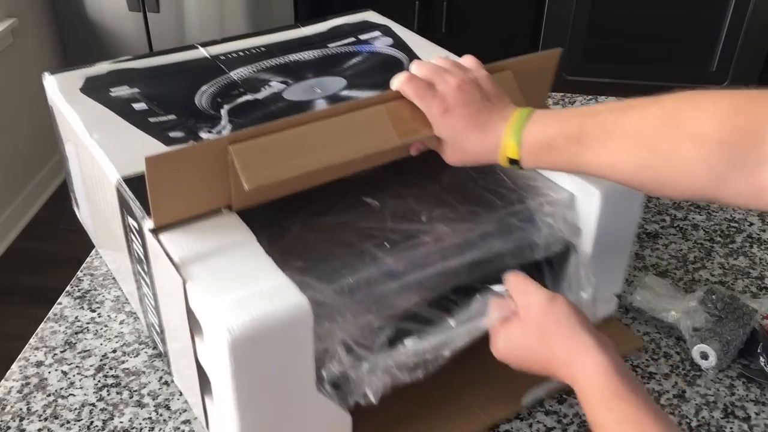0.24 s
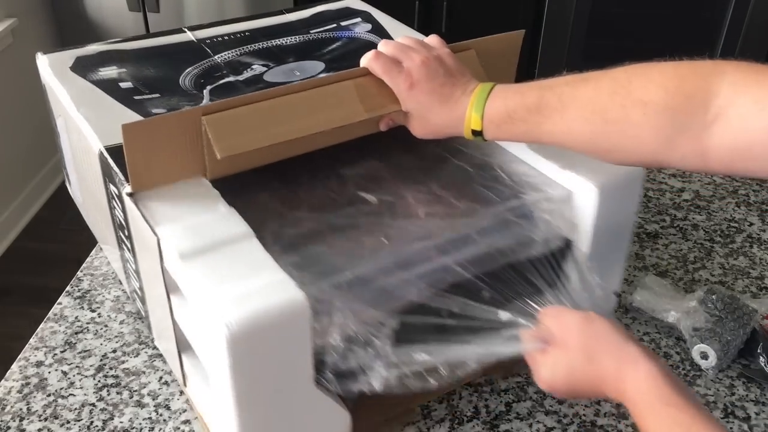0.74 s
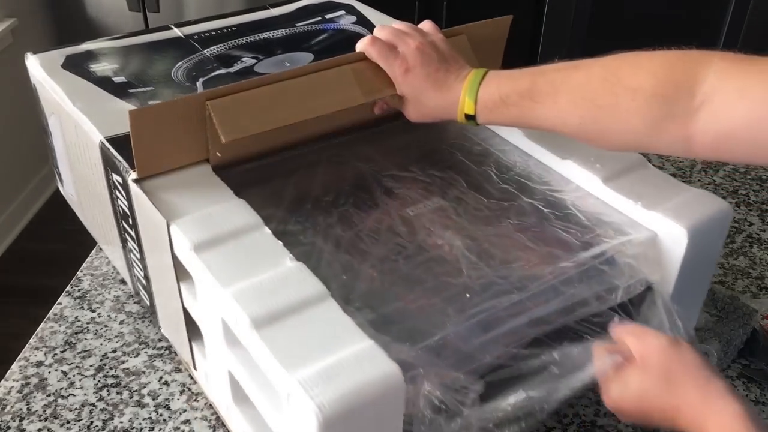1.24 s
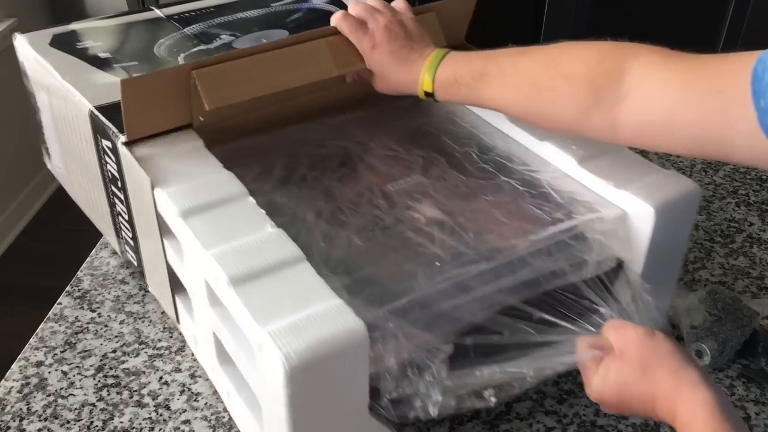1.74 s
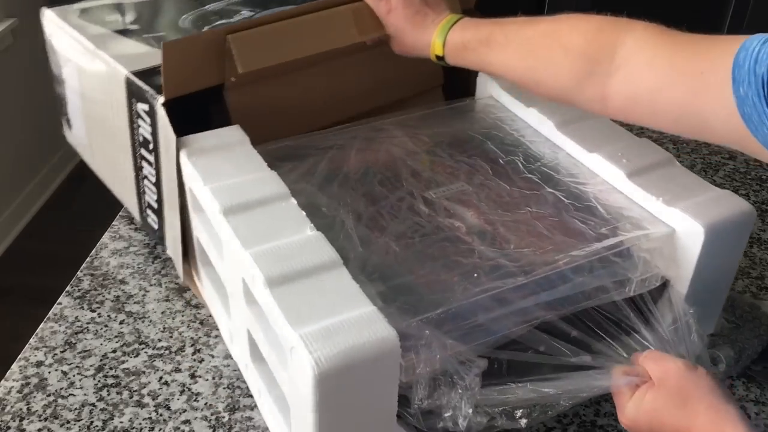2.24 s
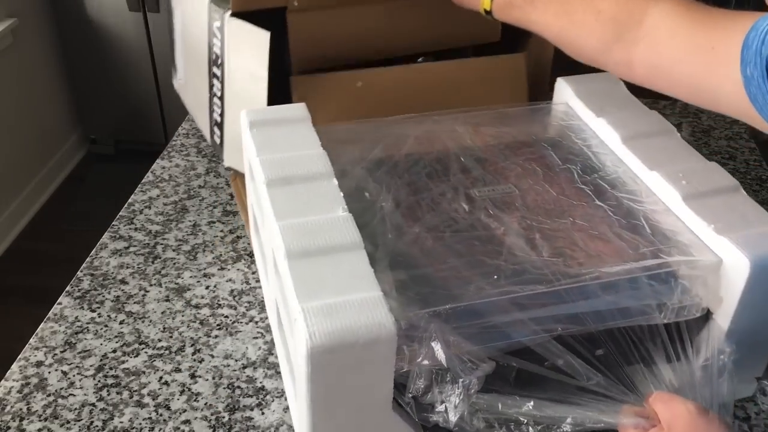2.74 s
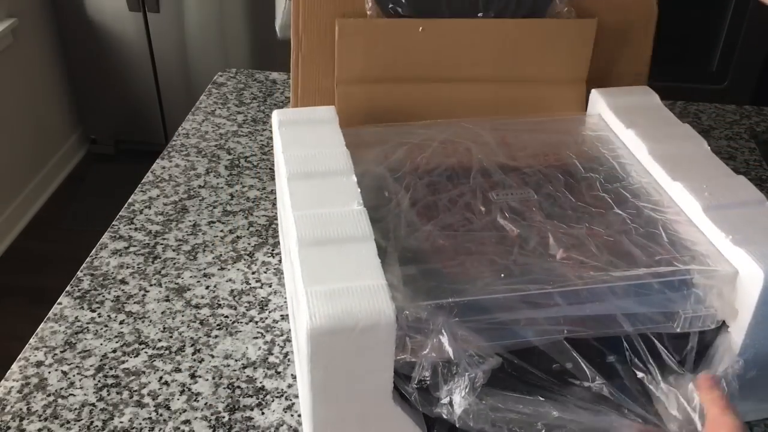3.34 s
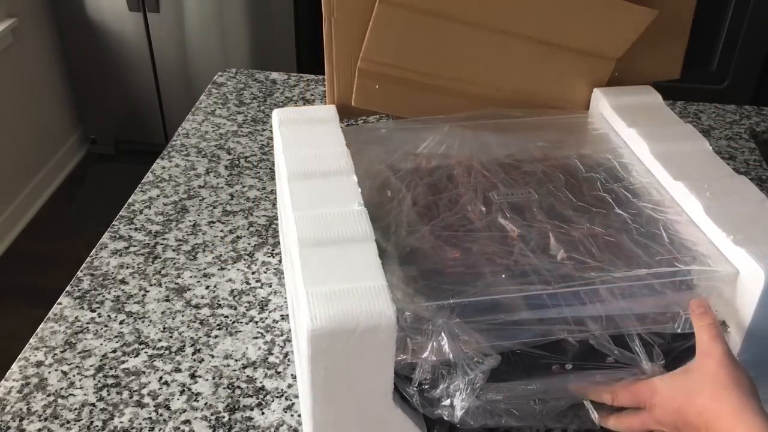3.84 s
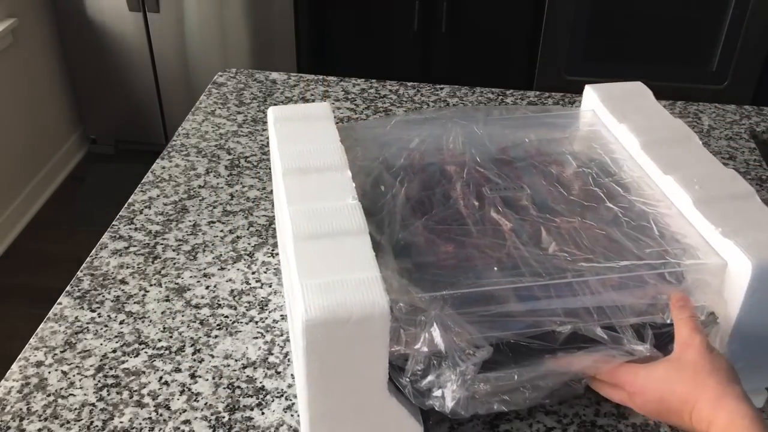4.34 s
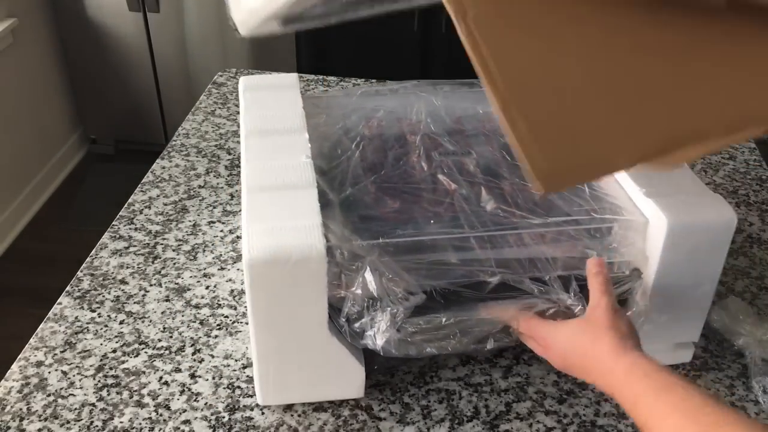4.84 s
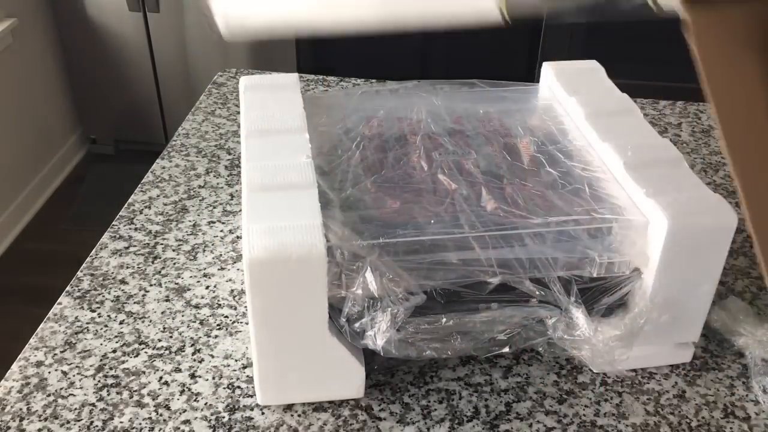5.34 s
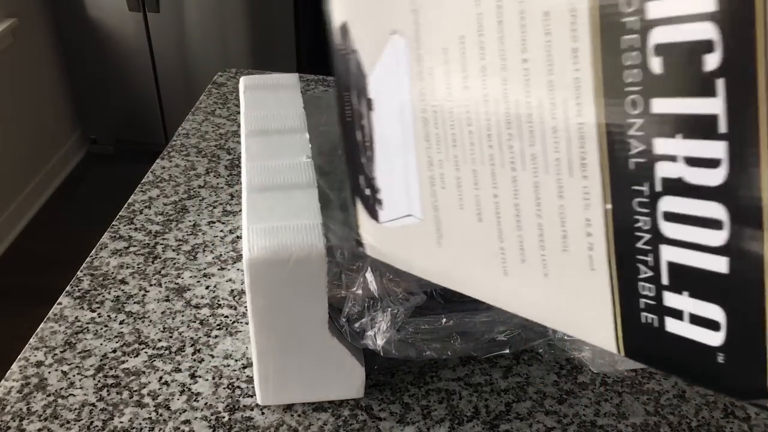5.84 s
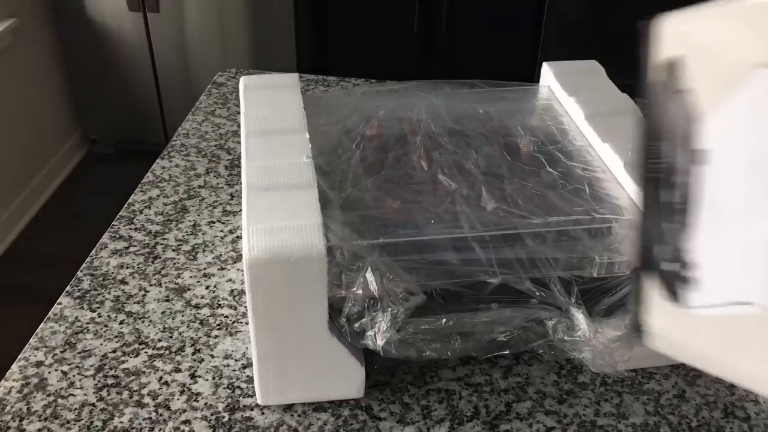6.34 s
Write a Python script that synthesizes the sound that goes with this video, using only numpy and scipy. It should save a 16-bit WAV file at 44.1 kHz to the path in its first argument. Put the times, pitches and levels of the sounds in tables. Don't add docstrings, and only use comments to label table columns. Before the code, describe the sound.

Close dry unboxing: crackling film and squeaky-fine foam friction, a burst of hard cardboard knocks and sharp foam cracks, then quiet swishes and light ticks.

```python
import sys
import numpy as np
from scipy import signal
from scipy.io import wavfile
from scipy.ndimage import uniform_filter1d

SR = 44100
rng = np.random.default_rng(int(sys.argv[2]) if len(sys.argv) > 2 else 0)


def wav_record(signal):
    frames = np.transpose(np.atleast_2d(signal))
    bounded = np.clip(frames, -1, 1)
    quanta = np.round(bounded * 32767).astype(np.int16)
    wavfile.write(sys.argv[1], SR, quanta)


def invert_db(level):
    return 10 ** (np.asarray(level, dtype=float) / 20)


N = 290619

# (full pressure at t/s, hold/s, level/dB, rise/s, fall/s)
PULLS = [(0.0, 0., -41, 0.12, 0.11), (0.062, 0.00054, -38, 0.018, 0.021), (.13, 0.44, -55.5, 0.053, 1),
         (0.629, 0.54, -36.5, 0.1, 0.11), (1.27, .05, -55, .1, .6), (1.643, 0.12, -38, 0.13, 0.25),
         (1.876, 0.23, -46, .2, 0.09), (2.35, 0.01, -42, 0.59, 0.58), (2.632, 0.024, -37.5, 0.019, 0.13),
         (2.765, 0.06, -41.5, 0.47, 0.3), (3.024, 0.047, -39, 0.043, 0.038),
         (3.11, 0.092, -37.5, .03, 0.17)]
# (t/s, hold/s, level/dB, rise/s, fall/s)
SHIFTS = [(3.598, 0.0028, -42.5, 0.78, 0.17), (3.86, 0., -50.5, 0.23, 0.83), (4.15, 0.046, -45.5, 1, 0.17),
          (4.3, 0.22, -50, 0.092, 0.09), (4.563, 0.034, -40.5, 0.14, 0.22), (4.858, 0.15, -58, .25, 0.17),
          (5.07, 0.013, -50.5, 0.76, 0.16), (5.23, 0.0075, -52, 0.041, .2), (5.32, 0.011, -50, 0.067, .15),
          (5.38, 0.2, -54.5, .1, .04), (5.634, 0.019, -57.5, .06, 0.13), (5.897, 0.076, -53.5, 0.018, 0.18),
          (6.255, 0., -51.5, 0.027, 0.19), (6.452, 0, -55, .07, 0.17), (6.59, 0.027, -46, 0.037, .1)]


def evened(x):
    return x / np.sqrt(np.mean(x ** 2) + 1e-20)


def peaked(x):
    return x / np.max(abs(x))


def read(points, hz):
    f, value = np.transpose(points)
    return np.interp(np.log(hz + 1), np.log(f + 1), value)


def add(mix, s, sound):
    part = mix[round(s * SR):][:len(sound)]
    part += sound[:len(part)]


def hits(rows, source, samples):
    layer = np.zeros(N)
    for row in rows:
        add(layer, *source(*row, rng.standard_normal(samples)))
    return layer


def resonate(x, hz, width):
    r = np.exp(-np.pi * width / SR)
    pole = r * np.exp(2j * np.pi * hz / SR)
    return 2 * signal.lfilter([(1 - r) ** 2], [1, -2 * pole, pole ** 2], x).real


def filtered(x, order, hz, kind="low"):
    return signal.sosfilt(signal.butter(order, hz, kind, fs=SR, output="sos"), x)


def friction(spectrum, level_db, grains_per_s, spread_db, grain_share, patchy_db):
    sizes = invert_db(spread_db * np.minimum(rng.exponential(1, N), 3.5))
    slips = sizes * (rng.random(N) < grains_per_s / SR)
    slips = np.convolve(slips, np.exp(-np.arange(200) / 50.0))[:N] * rng.standard_normal(N)
    smooth = rng.standard_normal(N)
    drive = np.sqrt(grain_share) * evened(slips) + np.sqrt(1 - grain_share) * smooth
    hz, _, z = signal.stft(drive, SR, nperseg=1024, noverlap=768)
    patches = uniform_filter1d(rng.standard_normal(z.shape), 30, 0)
    patches = evened(uniform_filter1d(patches, 8, 1))
    z = z * invert_db(read(spectrum, hz)[:, None] + patchy_db * patches)
    sound = signal.istft(z, SR, nperseg=1024, noverlap=768)[1][:N]
    return invert_db(level_db) * evened(sound)


def strokes(rows, rest_db):
    t = np.arange(0, N + 128, 128)[:, None] / SR
    s, hold, level_db, rise, fall = np.transpose(rows)
    before = np.maximum(s - t, 0) / np.maximum(rise, .005)
    after = np.maximum(t - s - abs(hold), 0) / np.maximum(fall, .005)
    power = (invert_db(level_db - 20 * (before + after)) ** 2).sum(1) + invert_db(rest_db) ** 2
    return np.interp(np.arange(N) / SR, t[:, 0], 10 * np.log10(power))


def brush(s, level_db, hz, rise, fall, width):
    t = np.arange(-SR, SR) / SR
    band = evened(resonate(rng.standard_normal(len(t)), hz, width))
    uneven = evened(uniform_filter1d(rng.standard_normal(len(t)), size=900))
    away = np.where(t < 0, -t / max(rise, .005), t / max(fall, .005))
    sound = invert_db(level_db - 20 * away + 2.6 * uneven) * band
    return max(s - 1, 0), sound[max(round((1 - s) * SR), 0):]


def breaking(ms, noise):
    t = np.arange(len(noise)) / SR
    return noise * np.exp(-t / (0.00093 * max(ms, .3))) * np.minimum(t / .0001, 1)


def room_hiss():
    # (f/Hz, level/dB per Hz)
    quiet = [(880, -23), (1500, -29.5), (3020, -25), (3720, 8.5), (8970, 17.5), (15600, -4), (15950, -30)]
    return friction(quiet, -73, 100., 0.98, .02, 0.348)


def kitchen(x, count=4):
    # (f/Hz, t60/s)
    decay = [(100, 0.66), (300, 1), (600, 0.48), (1200, 0.67), (2500, 0.39), (9000, 0.32), (16000, 0.17)]
    taps = np.zeros((count, SR // 2))
    at = np.arange(200, SR // 2 - 20, 20)
    at = at + rng.integers(0, 20, (count, len(at)))
    np.put_along_axis(taps, at, rng.choice([-1., 1.], at.shape), 1)
    hz, t, z = signal.stft(taps, SR, nperseg=256)
    tail = signal.istft(z * invert_db(-60 * t / read(decay, hz)[:, None]), SR, nperseg=256)[1]
    path = np.arange(N) // 30 % count == np.arange(count)[:, None]
    return signal.fftconvolve(x * path, tail / np.linalg.norm(tail[0]), axes=1)[:, :N].sum(0)


def air_whistle():
    # (t/s, level/dB, f/Hz, rise/s, fall/s)
    whistle = [
        (5.088, -53.5, 4570, 0.59, 0.28),
        (5.9, -70, 3000, 0.38, .6),
        (5.98, -59, 4600, 0.19, 0.11),
    ]
    layer = np.zeros(N)
    for row in whistle:
        add(layer, *brush(*row, 750.))
    return layer


def whispers_and_scuffs():
    # (t/s, level/dB, f/Hz, rise/s, fall/s)
    whispers = [(5.3, -56, 5840, 0.35, .2), (5.55, -53, 5900, 0.23, 0.17), (6.1, -70, 2800, 0.27, 0.26),
                (5.96, -62, 6000, .15, .12), (5.95, -62, 14000, 0.11, .1), (6.27, -61, 4460, 0.11, 0.23),
                (6.48, -54.5, 5160, 0.12, 0.074), (2.35, -43.5, 10500, 0.15, 0.3),
                (.72, -37.5, 10800, 0.13, 0.42), (3.225, -43.5, 4500, .04, 0.063),
                (4.845, -46, 12500, .03, .03), (4.9, -50.5, 8000, 0.041, .04), (4.578, -45, 2500, .01, .1),
                (5.09, -47, 10000, .08, 0.12), (3.72, -35, 1180, .01, .25), (4.62, -39, 390, .04, .22),
                (3.15, -31, 400, .02, .3), (3.16, -33, 1150, .03, .3)]
    layer = np.zeros(N)
    for row in whispers:
        add(layer, *brush(*row, 0.19 * row[2]))
    return layer


def card_edges():
    # (t/s, level/dB, f/Hz, rise/s, fall/s)
    brushing = [(.208, -50, 4470, 0.057, 0.0082), (4.33, -52.5, 3700, 0.11, .2),
                (4.444, -37.5, 4160, 0.018, 0.027)]
    # (t/s, level/dB, f/Hz, rise/s, fall/s)
    scuffing = [(2.67, -41, 1150, 0.15, 0.07), (2.56, -46, 1150, .04, .15), (2.6, -45, 580, .2, .2),
                (4.63, -39, 720, .03, .22), (4.745, -45, 820, .04, .08), (6.32, -54, 820, .08, .08),
                (5.35, -46.5, 780, 0.0099, 0.22), (6.42, -46.5, 940, 0.028, 0.031)]
    layer = np.zeros(N)
    for rows, width in (brushing, 740.), (scuffing, 330.):
        for row in rows:
            add(layer, *brush(*row, width))
    return layer


def counter_jolts():
    # (f/Hz, level/dB per Hz)
    rumble = [(12, -1), (20, 0.5), (45, -2), (92, -4.5), (124, 1), (166, -32.5), (236, 5.5), (300, -31),
              (390, -56), (660, -120)]
    # (t/s, hold/s, level/dB, rise/s, fall/s)
    jolts = [(.75, 0.14, -53, 0.31, 0.12), (1.64, 0.14, -49.5, 0.14, 0.26), (1.8, 1.75, -60.5, 0.34, .2),
             (3.125, 0.037, -27, .02, .1), (3.23, 0.087, -36, 0.11, 0.13), (2.36, 0.047, -46, .03, .12),
             (5.92, 0, -47.5, .02, 0.22), (6.48, .01, -46, .02, .08), (4.12, 0.079, -36.5, 0.096, .12),
             (4.08, 0.14, -39.5, 0.26, 0.32), (4.6, 0.04, -31, 0.16, 0.13), (5.19, 0.18, -53, 0.91, 0.13),
             (6.61, 0.086, -50, 0.65, 0.092)]
    return friction(rumble, strokes(jolts, rest_db=-57.5), 35.0, 2.8, 0.23, 1.9)


def box_scrape():
    # (f/Hz, level/dB per Hz)
    hollow = [(88, -50.5), (150, 3), (205, -7.5), (281, 0.5), (352, -5), (469, -2), (737, -2.5), (1200, -4),
              (1580, -8.5), (2200, -15), (3900, -20), (6600, -120)]
    # (t/s, hold/s, level/dB, rise/s, fall/s)
    scrapes = [(0.0, 0.43, -52.5, .1, 0.15), (.6, 0.37, -51.5, .1, 0.72), (.75, 0.47, -45, 0.65, 0.19),
               (1.74, 0.052, -37.5, 0.38, 0.083), (1.9, 1.14, -48.5, 0.64, .3),
               (3.17, 0.058, -29.5, 0.04, 0.19), (3.38, 0.16, -32, 0.053, 0.14),
               (3.82, 0.0086, -38.5, 0.99, 0.24), (4.16, 0.066, -41, 0.26, 0.59),
               (4.4, 0.39, -54, 0.45, 0.31), (5.3, 0.41, -55, 0.17, 0.64)]
    return friction(hollow, strokes(scrapes, rest_db=-58), 330.0, 2., 0.32, 1.45)


def knock(s, peak_db, hz, upper_db, t60, noise):
    # (factor on the pitch, level/dB)
    panels = [(.6, 7), (1., 13.5), (1.699, 4.5), (2.8, -5)]
    t = np.arange(len(noise)) / SR
    rattle = noise * invert_db(-60 * t / max(t60, .02)) * np.minimum(t / 0.0021, 1)
    rattle[30] += 11.
    walls = sum(invert_db(db) * resonate(rattle, hz * k, 0.71 * hz * k) for k, db in panels)
    paper = resonate(rattle, 676, 1120.0) + 0.36 * resonate(rattle, 1370, 900.0)
    return s, invert_db(peak_db) * peaked(walls) + invert_db(upper_db - 0.5) * peaked(paper)


def box_bumps():
    # (t/s, wall peak level/dB, wall f/Hz, papery level/dB, t60/s)
    slaps = [(1.844, -30.5, 123, -30.5, 0.37), (3.105, -21, 345, -7, 0.18), (3.1255, -7, 290, -2.5, 0.063),
             (3.197, -9, 485, -15, 0.056), (3.308, -20.5, 129, -15.5, 0.044),
             (4.056, -13.5, 397, -17.5, 0.16), (4.282, -16.5, 720, -44, 0.09),
             (4.618, -15.5, 665, -34, 0.11), (5.213, -37, 396, -39, 0.1), (5.905, -23.5, 176, -31.5, 0.14),
             (6.471, -26, 280, -34, 0.09), (2.345, -24, 370, -37, .17), (5.55, -30, 240, -32, .12)]
    # (t/s, peak level/dB, f/Hz, t60/s)
    thuds = [(1.755, -21.5, 740, 0.093), (2.668, -24.5, 564, 0.1), (3.078, -27, 323, 0.13),
             (3.137, -10, 329, 0.1), (4.095, -7, 670, 0.092), (4.308, -23, 340, 0.098),
             (4.481, -33, 666, 0.45), (4.57, -15, 770, 0.059), (4.586, -18.5, 740, 0.06),
             (4.737, -28.5, 644, 0.16), (5.242, -29, 430, 0.14), (5.535, -29, 190, 0.12),
             (5.947, -28.5, 240, 0.18), (6.434, -41, 150, 0.06)]
    dull = [(s, db, hz, db - 48.5, t60) for s, db, hz, t60 in thuds]
    return filtered(hits(slaps + dull, knock, 9000), 3, [110, 1700], "band")


def wrinkle(s, peak_db, hz, noise):
    return s, invert_db(peak_db) * peaked(resonate(breaking(1.76, noise), hz, 0.36 * hz))


def wrinkles():
    # (t/s, peak level/dB, f/Hz)
    releases = [(.139, -34, 8000), (0.196, -41, 4580), (.318, -43, 9500), (.43, -36, 7000),
                (.499, -31, 9700), (.519, -39, 9500), (.546, -34, 8500), (.593, -30, 9000),
                (0.737, -30, 700), (0.757, -29, 1300), (1.241, -32, 9500), (1.287, -36, 4900),
                (1.322, -46, 11000), (1.374, -36, 8240), (1.406, -31, 8800), (1.4586, -37, 11000),
                (1.4955, -38, 8820), (1.609, -32, 9230), (2.192, -38, 7600), (2.222, -33, 10100),
                (2.574, -30, 10300), (2.586, -33, 8370), (2.63, -37, 9500), (2.658, -28, 4800),
                (2.7565, -22, 9850), (2.926, -39, 13500), (3.106, -23, 3260), (3.127, -22, 3270),
                (3.963, -24, 9300), (4.301, -29, 8050), (4.327, -30, 3500), (4.49, -33, 6500),
                (4.525, -26, 9000), (4.543, -29, 7500), (4.555, -37, 8500), (4.8743, -31, 8000),
                (4.912, -35, 12900), (4.949, -31, 9500), (5.0704, -39, 4580), (5.249, -34.5, 8260),
                (5.512, -35, 12400), (5.756, -39, 1500), (6.067, -45.5, 8500), (6.107, -43.5, 9130),
                (6.214, -41, 7000), (6.29, -38, 7200), (6.3105, -38, 10500), (6.333, -37, 9300),
                (6.418, -41, 9100), (6.4996, -35.5, 13000), (6.574, -34, 9460), (5.338, -32, 800),
                (5.338, -33, 1800), (3.4372, -6, 3300), (3.393, -12, 3100), (4.4515, -19.5, 4300),
                (4.213, -29, 7000), (4.29, -29, 10000), (4.597, -29, 13000), (4.62, -28, 2210),
                (0.5854, -25, 6500), (1.4, -29, 4600), (5.215, -37, 1300), (5.556, -35, 800),
                (1.2687, -35, 4700), (1.3515, -40, 9140), (1.3744, -38, 14800), (1.4059, -35, 14500),
              (1.5261, -33, 8390), (1.547, -35, 8000), (1.555, -36, 5200), (1.578, -35, 11500),
              (1.586, -30, 9500), (1.435, -44, 2700), (4.409, -36, 1300), (4.487, -33, 1250),
              (5.241, -39, 2100), (5.333, -36, 900), (5.908, -38, 1600), (3.137, -9, 950),
              (5.338, -34, 3200), (0.757, -32, 2800)]
    return hits(releases, wrinkle, 1000)


def tick(s, crack_db, crack_hz, body_db, body_hz, noise):
    burst = breaking(2.2, noise)
    crack = resonate(burst, crack_hz, 4900.0) + 0.5 * resonate(burst, 7940, 4500.0)
    body = resonate(burst, body_hz, 2340.0) - 0.04 * resonate(burst, 390, 770.0)
    return s + 0.00042, invert_db(crack_db) * peaked(crack) + invert_db(body_db + 4.5) * peaked(body)


def film_creases():
    # (t/s, crack peak level/dB, crack f/Hz, body level/dB, body f/Hz)
    pops = [(.0659, -19.5, 12700, -31, 4800), (.076, -21.5, 13300, -51, 4310),
            (.0857, -3, 11600, -10, 4300), (.0875, -18, 11600, -45, 3120), (.0914, -11, 13000, -23, 3220),
            (.0937, -36, 7300, -23, 2540), (.5844, -19.5, 10200, -24.5, 3670),
            (1.3996, -33, 9400, -28, 2420), (1.6807, -22, 8600, -27.5, 2360),
            (1.7585, -20, 6800, -26.5, 3830), (1.7687, -31, 6170, -32, 5490),
            (1.7811, -23, 6900, -23.5, 5400), (1.8435, -39, 7600, -34.5, 2130),
            (2.6448, -30, 8180, -30, 5330), (2.6718, -21, 10600, -27.5, 4900),
            (3.1114, -17, 7360, -29, 3200), (3.308, -45.5, 9800, -32, 3680),
            (4.4502, -38, 12600, -27.5, 4360), (5.3352, -22.5, 9040, -30, 4840),
            (5.752, -41, 9000, -50, 2070)]
    # (t/s, peak level/dB, f/Hz)
    ticks = [(0.233, -32, 10000), (0.2494, -35, 9690), (0.35, -34.5, 10640), (0.489, -27.5, 10300),
             (0.4032, -34, 8200), (1.268, -30, 8000), (1.539, -28, 7900), (1.568, -26, 8750),
             (2.543, -27, 6760), (2.6089, -24.5, 9610), (3.345, -25, 8050), (4.2678, -19.5, 9200),
             (4.5739, -12, 7450), (4.722, -26.5, 6500), (4.7293, -23, 8300), (4.7793, -22.5, 8600),
             (4.838, -38, 12600), (5.222, -29, 8100), (6.2606, -32, 10160), (6.4356, -34, 5600),
             (6.544, -33.5, 9170)]
    thin = [(s, db, hz, db - 21.5, 3700) for s, db, hz in ticks]
    return hits(pops + thin, tick, 2000)


def film_rubbing():
    # (f/Hz, level/dB per Hz)
    sizzle = [(6470, -17), (11000, 18), (13100, 16.5), (15600, 7.5), (15950, -18), (16300, -17)]
    # (f/Hz, level/dB per Hz)
    rustle = [(880, -34), (1500, 0), (2320, 1.5), (2700, 4), (3740, 2), (4130, 4), (6000, 3.5), (6500, 3),
              (8450, -5.5), (14300, -120)]
    # (t/s, level/dB, rise/s, fall/s)
    crumples = [(.11, -73, .3, .03), (3.7, -44, 0.097, 0.16), (4.45, -38, 0.15, 0.063),
                (4.6, -64, 0.055, 0.067), (4.97, -44, .1, 0.089), (5.14, -44.5, 0.12, 0.13),
                (5.58, -55.5, .9, .02), (5.634, -51, .02, 0.065), (6.27, -56, 0.1, 0.18),
                (6.45, -59.5, .03, .2)]
    # (t/s, level/dB, rise/s, fall/s)
    settles = [(1.27, -54, .1, .6), (1.42, -54, 0.074, 0.03), (2.69, -45, 0.37, 0.077),
               (3.6, -40.5, .4, 0.1), (3.8, -37.5, 0.38, 0.24), (4.15, -39.5, 0.48, 0.24),
               (4.276, -41, 0.042, 0.13), (5.32, -48.5, 0.098, 0.18), (5.5, -58, 0.42, 0.99),
               (6.27, -58.5, 0.12, 0.16)]
    pulls = np.array(PULLS + SHIFTS)

    def moves(under_db, rows):
        return np.vstack([pulls + [0, 0, under_db, 0, 0], np.insert(rows, 1, 0, axis=1)])

    thin = friction(sizzle, strokes(moves(-10.5, crumples), rest_db=-70), 600., 3.9, 0.21, 1.2)
    slack = friction(rustle, strokes(moves(-4.5, settles), rest_db=-70.5), 400., 5.5, 0.19, 1.0)
    return thin + slack


def gulp(s, peak_db, hz, ms):
    t = np.arange(0, .001 * ms, 1 / SR)
    swell = np.sin(np.pi * (t / (0.00101 * ms)) ** 1.28)
    return s, invert_db(peak_db) * swell * np.sin(2 * np.pi * hz * t)


def squeezed_air():
    at = [3.4625, 3.4695, 3.5113, 3.984, 4.001, 4.056, 4.047, 3.1055, 3.126, 3.437, 4.106, 3.369, 3.709,
          3.7675, 4.57, 4.586, 2.344, 4.283]
    # (peak level/dB, f/Hz, length/ms)
    gulps = [(0, 1030, 5.8), (-15.5, 954, 3.9), (-1, 1055, 4.2), (-8, 1050, 7.0), (-15.5, 1100, 6.9),
             (-3.5, 880, 6.1), (-15, 890, 5.), (-10.5, 1150, 5.8), (-7.5, 1100, 6.), (-13.5, 1100, 4.),
             (-15.5, 805, 7.1), (-30, 1100, 5.), (-14.5, 1165, 5.5), (-13.5, 1156, 5.6), (-18, 744, 7.),
             (-18, 792, 8.2), (-30.5, 550, 9.2), (-22.5, 722, 7.8)]
    layer = np.zeros(N)
    for s, row in zip(at, gulps):
        add(layer, s, gulp(s, *row)[1])
    return layer


def judder():
    # (t/s, level/dB)
    slide = [
        (0.8, -45),
        (0.91, -45),
        (1.14, -38.5),
        (1.224, -54),
        (1.24, -52),
    ]
    s, level_db = np.transpose(slide)
    t = np.arange(s[0], s[-1], 1 / SR)
    turn = 2 * np.pi * 80 * t
    shake = np.sin(turn) + invert_db(-13.5) * np.sin(2 * turn + 1.4)
    level = np.sqrt(2) * invert_db(np.interp(t, s, level_db))
    return s[0], level * shake * signal.windows.tukey(len(t), .2)


def foam_rubbing():
    # (f/Hz, level/dB per Hz)
    hiss = [(2940, -41), (5000, -15), (6010, -1), (7370, 10.5), (10500, 13.5), (13000, -5.5)]
    return friction(hiss, strokes(PULLS + SHIFTS, rest_db=-70), 500., 4.1, 0.15, 1.8)


def snap(s, crack_db, crack_hz, ring_db, ms, noise):
    # (f/Hz, width/Hz, level/dB)
    foam = [
        [(2296, 740, -2), (3100, 2370, -1.5), (4300, 11200, -7.5)],
        [(6270, 2900, -4.5), (8800, 5300, -4), (10600, 3000, -47.5)],
    ]
    # (f/Hz, width/Hz, level/dB)
    cavity = [(1087, 160, -28), (1283, 1350, -0.5), (1790, 330, -6), (282, 53, -3.5)]
    t = np.arange(len(noise)) / SR
    burst = breaking(ms, noise)
    mid, top = (sum(invert_db(db) * resonate(burst, hz, w) for hz, w, db in part) for part in foam)
    top = top + resonate(burst, crack_hz, 2000.0)
    push = np.sin(2 * np.pi * cavity[0][0] * t) * np.exp(-(t / (0.00051 * max(ms, .3))) ** 4)
    shove = push + 3.84 * burst
    ring = sum(invert_db(db) * resonate(shove, hz, w) for hz, w, db in cavity)
    block_db = -1 + 0.47 * ring_db
    sound = invert_db(crack_db) * peaked(top) + invert_db(block_db + 5.5) * peaked(mid)
    return s + 0.00046, sound + invert_db(ring_db + 9.0) * peaked(ring)


def foam_snaps():
    # (t/s, crack level/dB, crack f/Hz, cavity ring level/dB, length/ms)
    snaps = [(3.3782, -15, 10000, -29, 0.85), (3.3892, -14, 10800, -32.5, 1.7),
             (3.3927, -9.5, 7500, -26.5, 2.6), (3.437, -5.5, 8200, -21.5, 2.3),
             (3.4405, -15.5, 8200, -21, 4.4), (3.462, -7.5, 8000, -11, 5.2), (3.511, -6, 10200, -13.5, 4.7),
             (3.7085, -2.5, 10000, -17.5, 3.8), (3.7674, -5, 8100, -15, 1.8), (3.7719, -5, 8200, -26, 1.5),
             (3.9837, -3, 6150, -17, 2.7), (3.9932, -2.5, 6940, -16.5, 2.), (3.9991, -7, 6440, -16.5, 1.6),
             (4.0485, -22, 9500, -23, 2.2), (4.0528, -4.5, 6550, -28.5, 2.3),
             (4.056, -0.5, 6260, -18.5, 2.7)]
    return filtered(hits(snaps, snap, 2000), 2, 11000)


def echoes(creases, jammed, squeezed, bumps):
    bright = filtered(invert_db(-55.0) * creases + invert_db(-11.5) * jammed, 4, 2000, "high")
    bright = bright - 0.28 * resonate(bright, 6400, 3000.)
    treble = signal.lfilter([1, -1], [1, -.85], kitchen(bright))
    boxy = resonate(jammed + .35 * squeezed, 1350, 1200.0)
    dull = invert_db(-9.5) * resonate(bumps, 750, 1100.) + invert_db(-8.0) * boxy
    return treble + kitchen(dull, count=1)


def scene():
    out = room_hiss() + air_whistle() + whispers_and_scuffs() + card_edges()
    out += counter_jolts() + box_scrape() + film_rubbing() + foam_rubbing()
    add(out, *judder())
    bumps, creases = box_bumps(), film_creases()
    squeezed, jammed = squeezed_air(), foam_snaps()
    out += bumps + creases + wrinkles() + squeezed + jammed
    return (out + echoes(creases, jammed, squeezed, bumps))[None]


def low_pass(x):
    return signal.sosfilt(signal.butter(12, 15850, fs=SR, output="sos"), x)


def record(dry):
    limited = signal.oaconvolve(dry, signal.firwin(255, 16350, fs=SR)[None], "same")
    return low_pass(np.clip(limited, -.98, .98))


dry = scene()
out = record(dry)
wav_record(out)
```